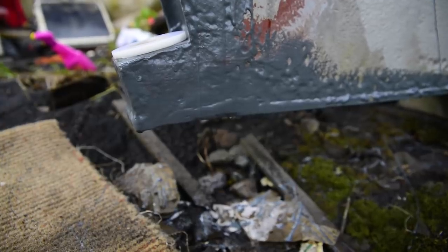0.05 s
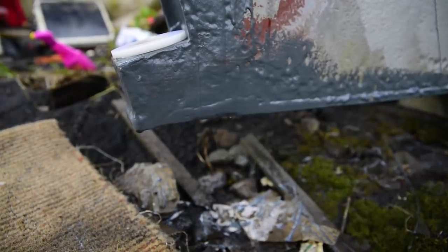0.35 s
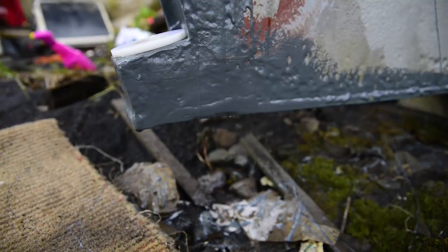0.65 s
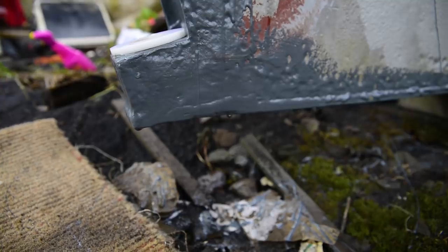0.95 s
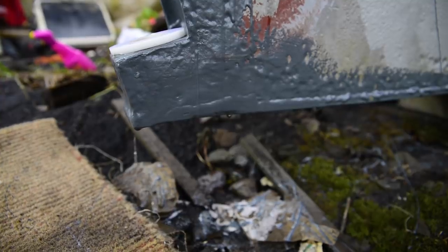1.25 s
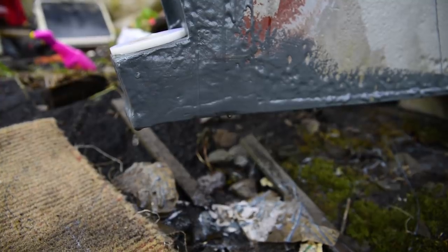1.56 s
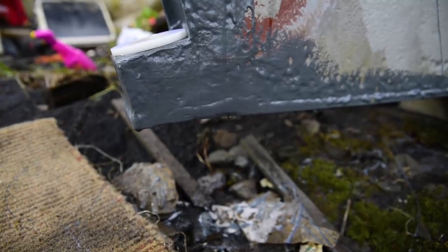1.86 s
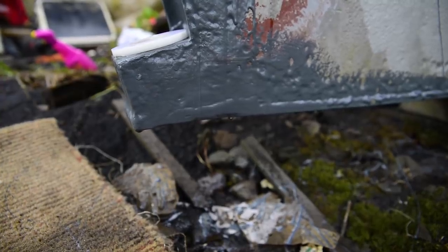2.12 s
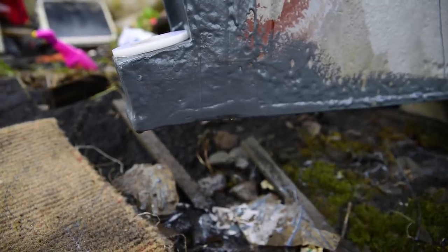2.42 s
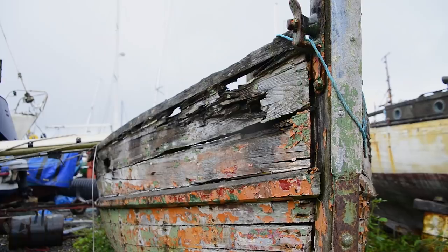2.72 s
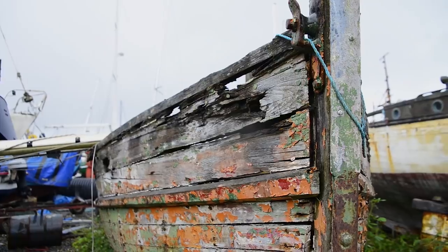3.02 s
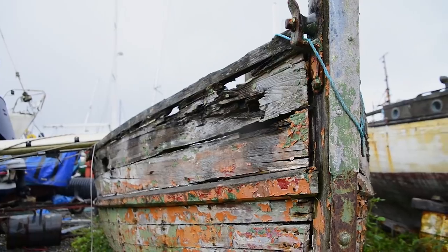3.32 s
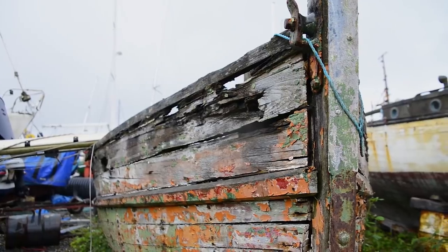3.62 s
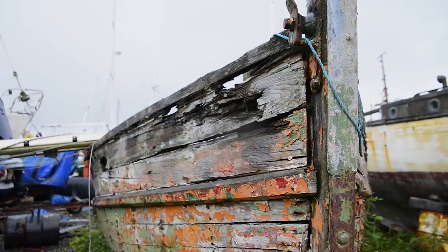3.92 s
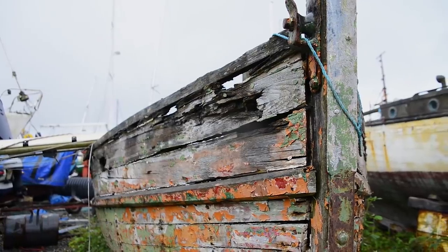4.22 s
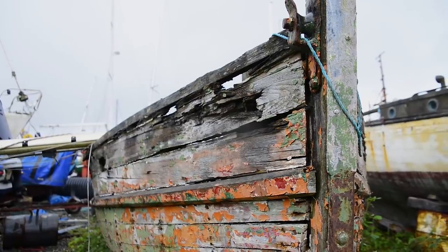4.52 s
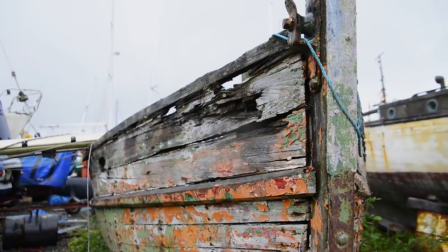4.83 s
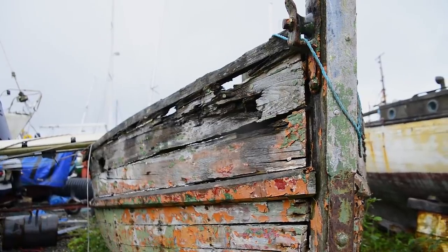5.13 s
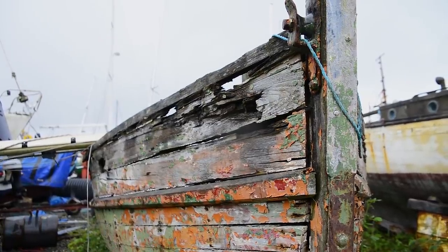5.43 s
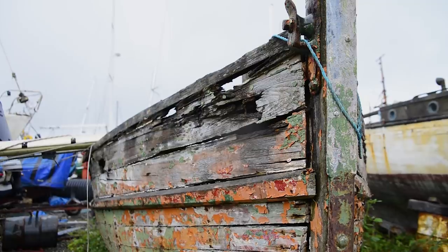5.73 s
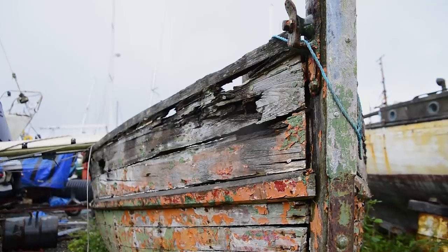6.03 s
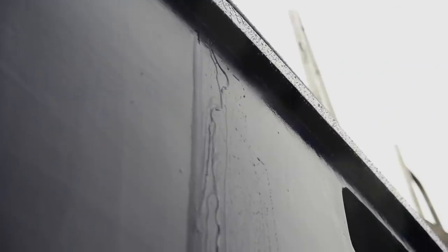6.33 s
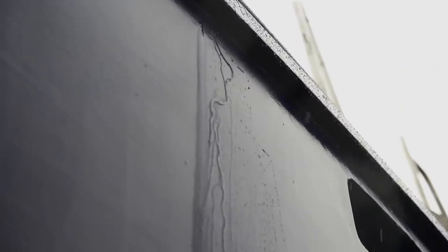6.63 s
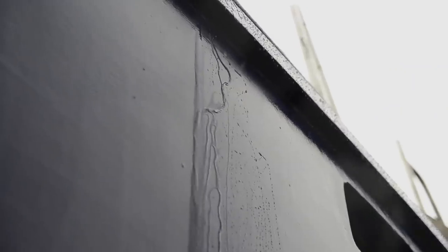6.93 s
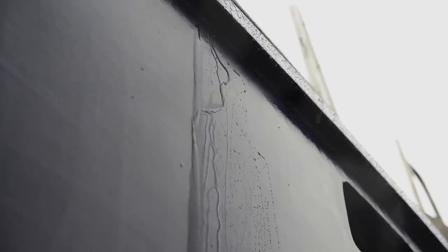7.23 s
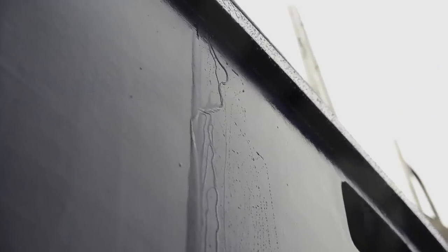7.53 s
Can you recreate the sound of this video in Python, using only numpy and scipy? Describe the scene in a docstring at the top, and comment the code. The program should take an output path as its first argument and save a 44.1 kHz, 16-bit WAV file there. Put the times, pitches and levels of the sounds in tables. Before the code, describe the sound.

Steady rain hisses on wet ground, then gives way to drizzle, with drops ticking and tapping on boat hulls and wind buffeting the microphone.

```python
"""A boatyard in the rain. First a steady hiss of countless small drops on wet ground, with a few fatter
drips. Then, out in the open, a thin drizzle: far drops blur into a soft hiss, nearer ones tap on wooden
hulls, and the closest tick on the microphone's housing, a heavy one with a low thud. Gusts buffet the
microphone, rumbling as their eddies pass its port."""
import sys
import numpy as np
from scipy import signal
from scipy.fft import rfft, irfft, next_fast_len
from scipy.io import wavfile
from scipy.ndimage import uniform_filter1d, map_coordinates

SR = 44100
rng = np.random.default_rng(int(sys.argv[2]) if len(sys.argv) > 2 else 0)


def to_wav(sig):
    """Store sig (one row per channel, or 1-D mono) as 16-bit WAV at the path in sys.argv[1].

    Samples outside -1..1 are clipped; the rate is SR.
    """
    pcm = np.clip(np.atleast_2d(sig), -1, 1) * 32767
    pcm = np.round(pcm).astype(np.int16)
    wavfile.write(sys.argv[1], SR, pcm.T)  # frames by channels


N = 342216
OPEN_AIR_S = 2.66  # steady rain before, drizzle and wind after
DROP_SAMPLES = 2048
TIME, DROP_TIME = np.arange(N) / SR, np.arange(DROP_SAMPLES) / SR

# spectrum of the bright snap of water on a hard surface: f/Hz, level/dB
SNAP_SPECTRUM = [(300, -7), (3000, -14), (8000, 5), (11000, -2.5), (16000, -13)]


def undb(db):
    """Decibels to gain."""
    return 10 ** (np.asarray(db) / 20)


def unit(x):
    """Scale to rms 1."""
    return x / np.sqrt(np.mean(x ** 2))


def add(out, s, sound):
    """Mix a sound in at s seconds."""
    start = int(np.clip(s * SR, 0, N - 1))
    out[start:start + len(sound)] += sound[:N - start]


def colour(x, spectrum):
    """Minimum-phase filter through rows of f/Hz, level/dB."""
    size = 2 * next_fast_len(len(x) // 2 + 1)
    hz, db = np.transpose(spectrum)
    bin_hz = np.arange(size // 2 + 1) * SR / size
    gain = undb(np.interp(np.log(bin_hz + 1), np.log(hz), db))
    cepstrum = irfft(np.log(gain))
    cepstrum[1:size // 2] *= 2
    cepstrum[size // 2 + 1:] = 0
    return irfft(rfft(x, size) * np.exp(rfft(cepstrum)))[:len(x)]


def waver(rate_hz):
    """Random steps, smoothed twice; rms 1."""
    hold = int(SR / rate_hz)
    steps = np.repeat(rng.standard_normal(N // hold + 1), hold)
    return unit(uniform_filter1d(uniform_filter1d(steps, hold), hold)[:N])


def ring(hz, cycles):
    """A damped oscillation that falls to 1/e in so many cycles."""
    turns = hz * DROP_TIME
    return np.sin(2 * np.pi * turns) * np.exp(-turns / cycles)


def drop_level(x, db):
    """Scale a drop so that its energy, spread over 5 ms, has the given level."""
    return x * undb(db) * np.sqrt(.005 * SR) / np.linalg.norm(x)


def splash(decay_s):
    """Spray that follows an impact: a short burst of droplets with unit energy."""
    envelope = np.exp(-DROP_TIME / decay_s) * (1 - np.exp(-2 * DROP_TIME / decay_s))
    burst = rng.standard_normal(DROP_SAMPLES) * envelope
    return burst / np.linalg.norm(burst)


def patter(per_s, spread_db):
    """Countless impacts, most tiny and a few large."""
    hits = rng.random(N) < per_s / SR
    sizes = undb(spread_db * np.minimum(rng.exponential(size=N), 5))
    return unit(hits * sizes * rng.choice([-1, 1], N))


def ground_splat(db, hz, decay_s):
    """A drip bursts on wet ground: a spray of droplets around one pitch."""
    droplet = ring(hz, cycles=1.36)
    spray = signal.fftconvolve(splash(decay_s), np.convolve(droplet, np.diff(droplet)))
    return drop_level(spray[:DROP_SAMPLES], db)


def steady_rain(hiss_db=-47, drip_boost_db=4, fizz_count=36):
    """Dense patter on the ground merges into a hiss, with fatter drips and a fizz of fine splashes."""
    # spectrum of rain on wet ground: f/Hz, level/dB
    rain_spectrum = [(25, -8.5), (120, -2), (420, -6), (600, -3), (850, -3.5), (1600, 1), (1900, -6),
                     (2850, -0.5), (4000, -4.5), (4500, -2), (5250, -6.5), (5950, -3.5), (7300, -16),
                     (11500, -29.5), (16000, -34.5)]
    # the clearest drips: t/s, level/dB before the boost, centre f/Hz
    drips = [(0.049, -44, 1480), (0.204, -46, 1600), (0.301, -49, 6700), (0.626, -49.5, 6200),
             (0.667, -56, 6750), (0.845, -51, 2600), (0.847, -53, 585), (1.041, -52, 1610),
             (1.171, -53, 7540), (1.543, -45.5, 1090), (1.55, -48, 5450), (2.131, -47.5, 1380),
             (2.245, -47, 1350), (2.352, -46, 4570), (2.422, -50, 1320)]
    impacts = patter(per_s=2500, spread_db=3.5) + undb(4) * rng.standard_normal(N)
    out = unit(colour(impacts, rain_spectrum)) * undb(hiss_db + 0.71 * waver(13.36))
    for s, db, hz in drips:
        add(out, s, ground_splat(db + drip_boost_db, hz, decay_s=0.0069))
    for when, size, pitch in rng.random((fizz_count, 3)):
        fizz = ground_splat(db=-62 + 7 * size, hz=6500 * 2 ** (0.3 * pitch), decay_s=0.0038)
        add(out, when * OPEN_AIR_S, fizz)
    return out


def buffets(gap_s=.028, jitter_s=0.0027, spread_db=1.5, octaves_per_db=-0.04):
    """Long gusts break into uneven buffets, stronger ones slightly lower. Yields t/s, level/dB, f/Hz."""
    # gusts on the microphone: start t/s, length/s, nominal level/dB, rumble centre f/Hz
    gusts = [(2.667, 0.045, -28.5, 107.1), (2.717, 0.001, -26.5, 129.6), (2.739, 0.0063, -31.5, 116),
             (2.785, 0, -14.5, 183.2), (2.801, 0.0021, -19, 217), (2.827, 0, -11.5, 184.4),
             (2.853, 0, -23.5, 180.4), (2.94, 0.00075, -23, 167.4), (2.969, 0, -19.5, 283.6),
             (3, 0, -21, 229), (3.035, 0.022, -28, 242.3), (3.072, .024, -24, 175.4),
             (3.124, 0, -16.5, 332.7), (3.141, 0.0021, -20.5, 198), (3.161, 0.0074, -28.5, 169),
             (3.181, 0, -38.5, 116), (3.25, 0, -49, 88.7), (3.445, .025, -49, 80.2),
             (3.554, 0, -37.5, 111.9), (3.591, 0.018, -35, 115), (3.863, 0.00085, -42, 103.5),
             (4.023, 0, -24, 171.4), (4.055, 0.11, -37.5, 140.4), (4.476, 0.0038, -40.5, 122.1),
             (4.545, 0, -24, 230.1), (4.603, 0, -28.5, 130), (4.646, 0.0015, -27.5, 215.4),
             (4.664, 0, -33, 125), (4.682, 0.0026, -26, 249.6), (4.708, 0, -33.5, 250.4),
             (4.792, 0.0092, -38, 157.6), (4.874, 0.044, -44.5, 86), (5.644, 0.016, -39, 105.4),
             (5.691, 0.001, -32.5, 129.3), (5.765, 0, -38, 124.1), (5.935, 0, -26.5, 148.7),
             (5.956, 0.0043, -25.5, 139.4), (5.981, 0.035, -36.5, 195.8), (6.049, 0, -21.5, 361),
             (6.07, 0, -25, 271.6), (6.087, 0.016, -31, 125.2), (6.192, 0.0031, -41.5, 134),
             (6.449, 0.011, -40.5, 125.6), (6.805, .035, -37.5, 125), (6.89, .06, -42.5, 110.1),
             (7.0, 0, -47.5, 110.5)]
    for start, length, db, hz in gusts:
        times = np.linspace(start, start + length, 1 + round(length / gap_s))
        scatter = rng.uniform(-1.008, 1, size=(12, 2)) * (len(times) > 1)  # none for a lone buffet
        for s, (late, strength) in zip(times, scatter):
            extra_db = spread_db * strength
            yield s + jitter_s * late, db + extra_db, hz * 2 ** (octaves_per_db * extra_db)


def wind(breeze_hz=76, flutter_db=4.5, buffet_s=.007):
    """Turbulence at the microphone: a fluttering breeze, and buffets that swell as their eddies pass."""
    # breeze between the gusts: t/s, nominal level/dB
    breeze = [(2.66, -54), (2.85, -37), (3.3, -59), (4.35, -59.5), (4.7, -47), (5.0, -70), (5.45, -72),
              (5.95, -42), (6.25, -64), (6.84, -49.5), (7.1, -62.5), (7.76, -61.5)]
    # spectrum of the eddies' pressure when the rumble centres on eddy_hz: f/Hz, level/dB
    eddy_spectrum = [(10, -10.5), (60, -2.5), (150, 1.5), (330, -10), (500, -21), (800, -32.5), (1500, -70),
                     (4000, -110)]
    eddy_hz = 164.6
    # response of the microphone's port, which leaks the deepest bass: f/Hz, level/dB
    port_response = [(10, -30), (30, -4.5), (60, 0), (120, 2), (16000, -4)]
    breeze_db = np.interp(TIME, *np.transpose(breeze)) - 1
    power = undb(breeze_db + flutter_db * waver(36)) ** 2
    weighted_hz = power * breeze_hz
    for s, db, hz in buffets():
        nearness = 1 / (1 + ((TIME - s) / buffet_s) ** 2)
        eddy_power = undb(db + 0.47) ** 2 * nearness ** 3
        power += eddy_power
        weighted_hz += eddy_power * hz
    # the pressure pattern is carried past the port at the speed of the air
    pattern = colour(rng.standard_normal(N), eddy_spectrum)
    travel = np.cumsum(weighted_hz / power / eddy_hz)
    swirl = colour(map_coordinates(pattern, [travel], order=3, mode="mirror"), port_response)
    swirl_power = uniform_filter1d(uniform_filter1d(swirl ** 2, size=500), size=500)
    return swirl * np.sqrt(power / swirl_power)


def drop_knock(db, hz, cycles=0.36, echo_s=.0035, hollow_hz=1400):
    """A drop's broad, dead knock on a wet hull or thud on the housing, with spray and a ground echo."""
    # spectrum of the splash: f/Hz, level/dB
    splash_spectrum = [(200, -14), (600, 4.5), (1500, 1.5), (3000, -1.5), (5800, 1.5), (7500, -3),
                       (11000, -23), (16000, -24)]
    # a fatter drop knocks lower and splatters for longer
    force = undb(-14) * splash(decay_s=0.00083) + undb(-12) * splash(decay_s=7 / hz)
    force[0] += 1  # the impact
    force[int(echo_s * SR * (.75 + .5 * rng.random()))] += undb(-14)
    # low knocks ring more, as hollow planking does
    resonance = np.diff(ring(hz, cycles * max(hollow_hz / hz, 1)))
    knock = signal.fftconvolve(force, resonance)[:DROP_SAMPLES]
    # the small struck patch radiates little below its own pitch; the soft drop dulls the top
    knock = colour(knock, [(hz / 4, -11), (hz, 0), (2 * hz, 0), (6 * hz, -4)])
    knock = unit(colour(knock, splash_spectrum))
    snap = undb(-30) * unit(colour(force, SNAP_SPECTRUM))
    return drop_level(knock + snap, db)


def housing_tick(db, hz, cycles, rebound_ms, splash_db, crisp_db):
    """A drop snaps on the microphone's housing, which rings; the water rebounds and its spray lands."""
    # response of the housing: f/Hz, level/dB
    housing_response = [(100, -16), (400, -31), (2450, -14.5), (3200, 1), (4300, -1.5), (5500, 7.5),
                        (6300, 3.5), (7500, -10.5), (10500, -33), (16000, -49)]
    force = undb(splash_db - 6) * splash(decay_s=0.0017) + undb(-24) * splash(decay_s=0.0067)
    force[0] += 1  # the impact
    force[round(rebound_ms * SR / 1000)] += undb(-7)
    ringing = signal.fftconvolve(force, ring(hz, cycles))[:DROP_SAMPLES]
    body = unit(colour(force + undb(-2) * ringing, housing_response))
    snap = undb(crisp_db - 20) * unit(colour(force, SNAP_SPECTRUM))
    return drop_level(body + snap, db)


def drizzle(hiss_db=-52, drop_count=200, wood_share=.72, fade_db_per_s=0.34):
    """Far drops blur into a soft hiss; faint near ones hit hulls and housing. It all slowly eases off."""
    # spectrum of distant drizzle: f/Hz, level/dB
    drizzle_spectrum = [(25, 6), (70, 8.5), (130, 0), (400, 0), (1000, 0.5), (2000, -0.5), (3400, -3.5),
                        (4800, -1.5), (6200, -3.5), (7500, -12), (11000, -23), (16000, -26.5)]
    impacts = patter(per_s=1500, spread_db=4.5) + rng.standard_normal(N)
    out = unit(colour(impacts, drizzle_spectrum)) * undb(hiss_db + 0.85 * waver(9.3))
    for when, size, pitch, surface in rng.random((drop_count, 4)):
        s = OPEN_AIR_S + when * (N / SR - OPEN_AIR_S)
        db = -55 + 9 * size ** 2
        if surface < wood_share:
            drop = drop_knock(db, hz=1200 * 3 ** pitch, cycles=0.79 + surface)
        else:
            drop = housing_tick(db, hz=3800 * 1.5 ** pitch, cycles=2.6,
                                rebound_ms=.55, splash_db=12, crisp_db=-10)
        add(out, s, drop)
    return out * undb(-fade_db_per_s * (TIME - OPEN_AIR_S))


def near_drops():
    """Single drops stand out of the drizzle, right on the microphone and on the hulls close by."""
    # drops on the housing: t/s, level/dB, ring f/Hz, ring length/cycles, rebound delay/ms,
    # relative splash/dB, relative crispness/dB
    ticks = [(2.8732, -25.5, 4380, 4.1, .59, -19, -3), (2.925, -44.5, 4500, 2.5, .5, -6, -6),
             (3.194, -39.5, 4190, 1.3, .84, -6, 1), (3.2183, -26, 4000, 0.58, 1.45, -3, -4.5),
             (3.2537, -38.5, 4510, 1.5, .88, -14, 0), (3.3585, -23.5, 4300, 1.33, .48, -13, -12),
             (3.443, -37, 5150, 2, .48, 4, -2), (3.642, -29, 4580, 2.1, .54, -6, -7),
             (3.6802, -32.5, 4430, 1.9, .54, -19, -4), (3.7216, -32, 4630, 1.13, .48, -8, 1),
             (3.7975, -32, 4320, 2, .64, -8, -2), (3.8979, -22, 4670, 4.3, 1.13, 3, -4.5),
             (3.9754, -38.5, 5490, 2.14, .45, -6, -4), (3.9903, -34.5, 4950, 4.7, 1.18, -3, -8),
             (4.026, -30, 5840, 4, .48, 2, -9), (4.0358, -41.5, 5500, 1.1, .5, -6, 2),
             (4.1955, -29.5, 4900, 1.87, 1.41, 11.5, -6), (4.255, -22.5, 4790, 2.9, .54, 2, -3.5),
             (4.2684, -38, 4480, 1.3, 1.16, 3, -2), (4.3264, -41.5, 4950, 1.55, .6, 7, 15),
             (4.4023, -25.5, 4890, 3.8, .42, -1, -9), (4.4787, -25, 4660, 1.55, .91, -4, -1.5),
             (4.9462, -43.5, 4920, 2.6, .5, -9, -10), (5.0546, -42, 6060, 1.5, .5, -9, 7),
             (5.089, -41, 4960, 1.2, .8, 0, -4), (5.3937, -22.5, 5000, 2.8, .48, -6, -3),
             (5.631, -38.5, 4850, 5.1, .48, 5, -2), (6.1957, -55, 4800, 1, .5, -6, 17),
             (6.3666, -33, 4790, 1.09, .64, 2, -5), (6.839, -40, 4664, 2.9, .5, 1, -11),
             (7.1895, -46, 4760, 3.4, .5, -1, -11), (7.2994, -42.5, 4520, 2.4, .5, 17, -14),
             (7.4232, -23, 4620, 1.6, .48, -26, 2.5), (7.473, -37.5, 4920, 3.4, .54, 4, -12)]
    # knocks on the hulls, plus the low thud of the heavy drop on the microphone's housing at 7.42 s:
    # t/s, level/dB, f/Hz
    knocks = [(2.6753, -45.5, 1580), (3.1570, -38.5, 1614), (3.2632, -37, 1496), (3.3386, -35.5, 1520),
              (3.369, -45, 2690), (3.608, -35, 1640), (3.6625, -45, 1704), (3.6985, -28.5, 2230),
              (3.726, -35, 1990), (3.7586, -44, 1247), (3.7715, -38.5, 1400), (3.78, -47, 1790),
              (3.875, -43, 1600), (4.0443, -41.5, 1990), (4.0981, -43, 2480), (4.1305, -41.5, 1361),
              (4.4313, -45, 2814), (4.5500, -41, 2290), (4.7197, -38, 2130), (4.7504, -41, 1640),
              (4.7618, -47, 1795), (4.8293, -43.5, 1890), (4.8604, -42.5, 2300), (4.8766, -33.5, 1630),
              (5.0475, -43.5, 2100), (5.1503, -40.5, 1425), (5.1986, -47, 3300), (5.233, -42, 2450),
              (5.2462, -33, 850), (5.2582, -44, 2070), (5.301, -43.5, 3260), (5.4371, -42.5, 1810),
              (5.478, -44, 3210), (5.541, -37, 1945), (5.591, -43, 2617), (5.904, -45, 2077),
              (6.1473, -43.5, 1343), (6.1555, -46, 2205), (6.2968, -43, 1750), (6.402, -45, 1815),
              (6.7075, -32.5, 850), (6.7923, -33.5, 800), (6.88, -42.5, 950), (6.9382, -37, 1805),
              (7.3042, -42, 1303), (7.404, -45, 1590), (7.4221, -41.5, 340), (7.5439, -34.5, 1407),
              (7.5479, -37, 1710)]
    out = np.zeros(N)
    for s, *drop in ticks:
        add(out, s, housing_tick(*drop))
    for s, db, hz in knocks:
        add(out, s, drop_knock(db, hz))
    return out


def scene():
    """One microphone: steady rain gives way within 7 ms to drizzle and wind in the open."""
    in_open = np.clip((TIME - OPEN_AIR_S) / 0.007 + .5, 0, 1)
    weather = (1 - in_open) * steady_rain() + in_open * (drizzle() + wind())
    return (weather + near_drops())[None]


def record(dry):
    """The recorder cuts the top steeply above 16 kHz."""
    return signal.sosfilt(signal.ellip(8, .2, 70, 16000, fs=SR, output="sos"), dry)


dry = scene()
out = record(dry)
to_wav(out)
```